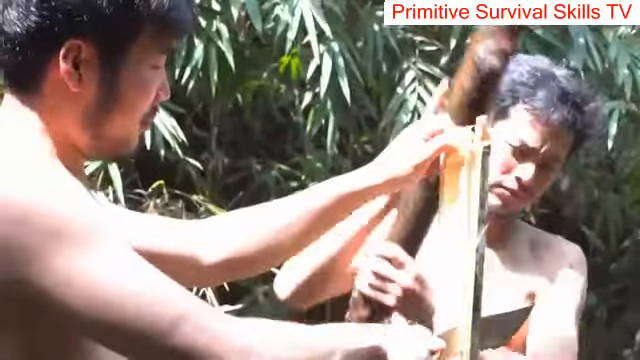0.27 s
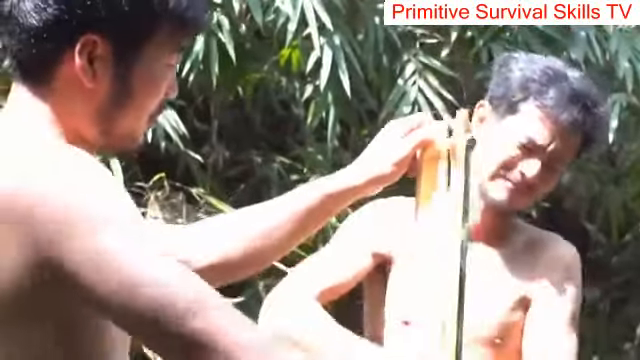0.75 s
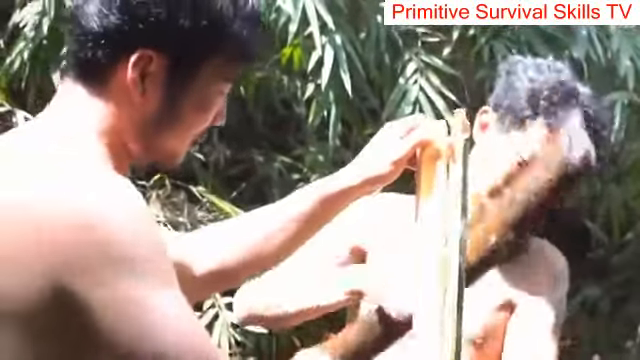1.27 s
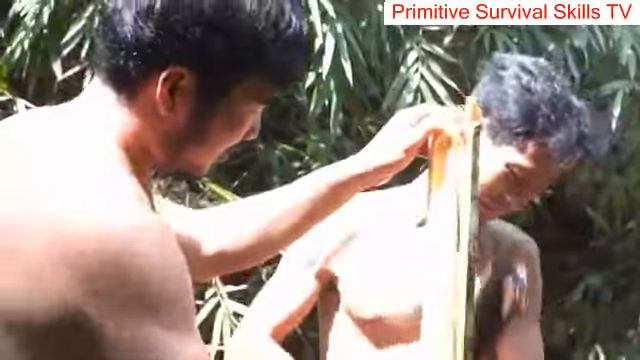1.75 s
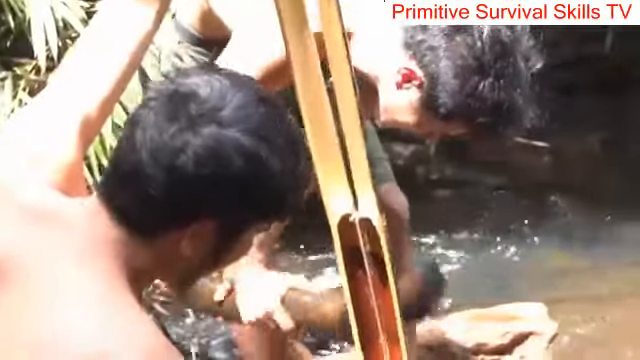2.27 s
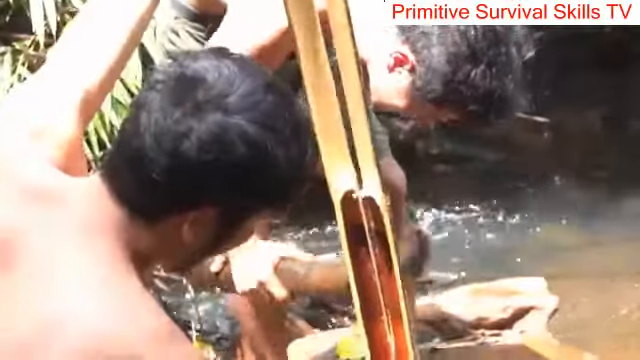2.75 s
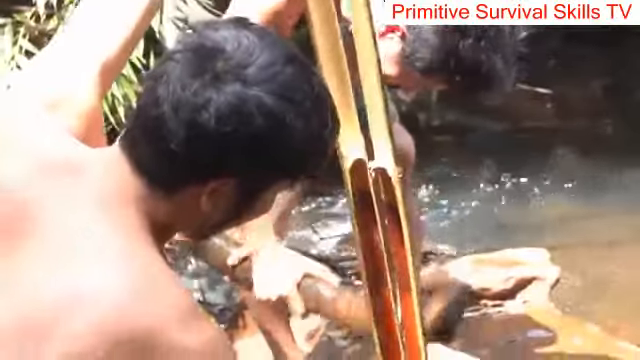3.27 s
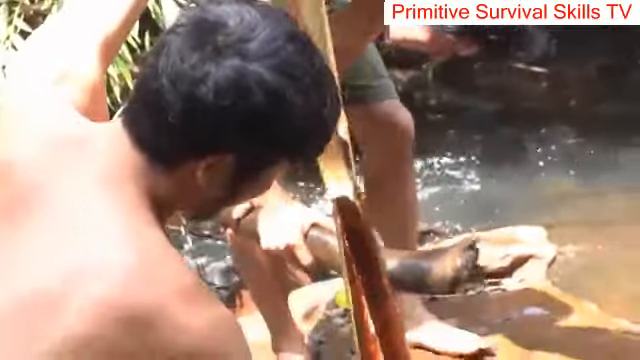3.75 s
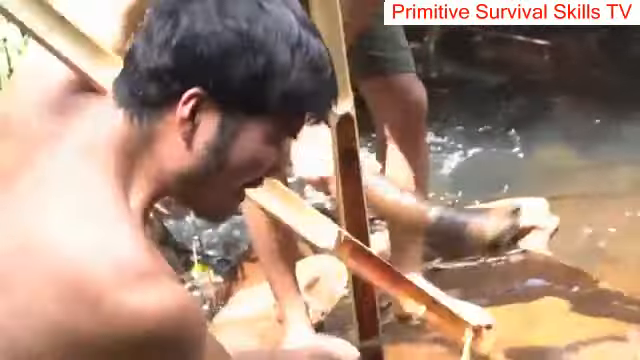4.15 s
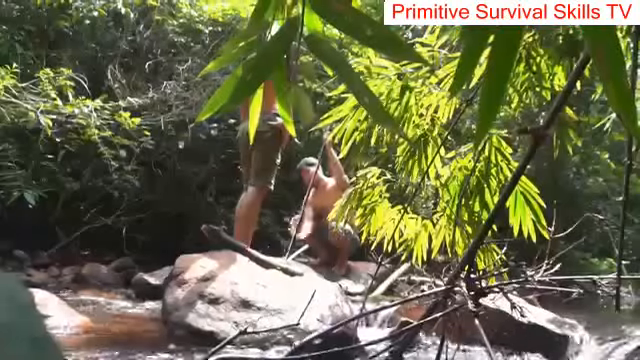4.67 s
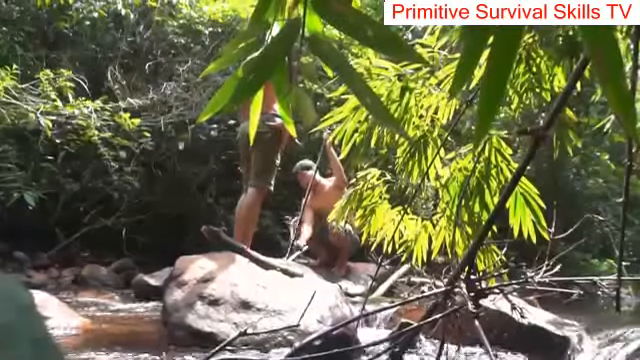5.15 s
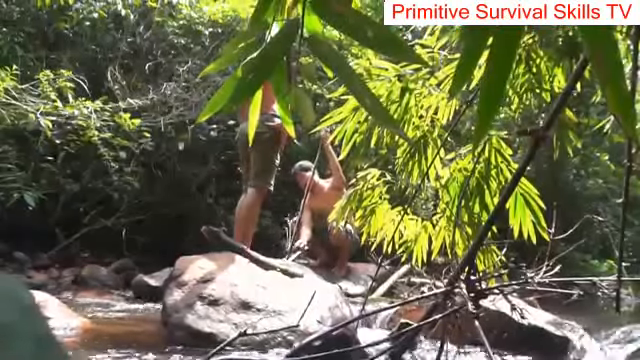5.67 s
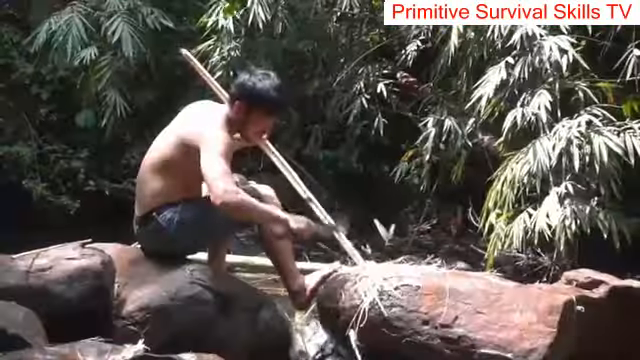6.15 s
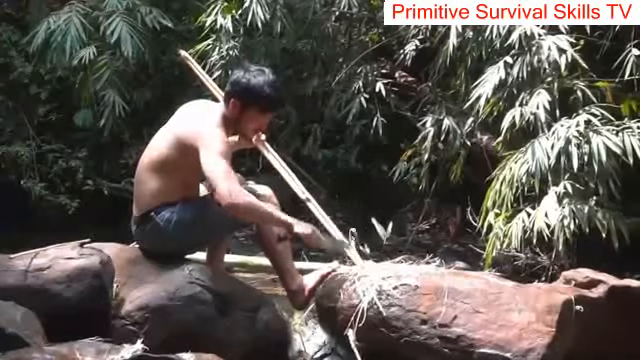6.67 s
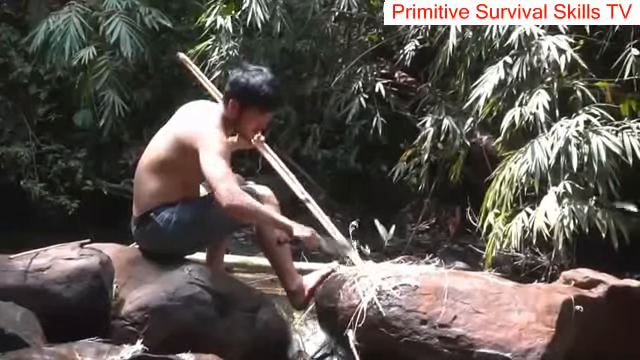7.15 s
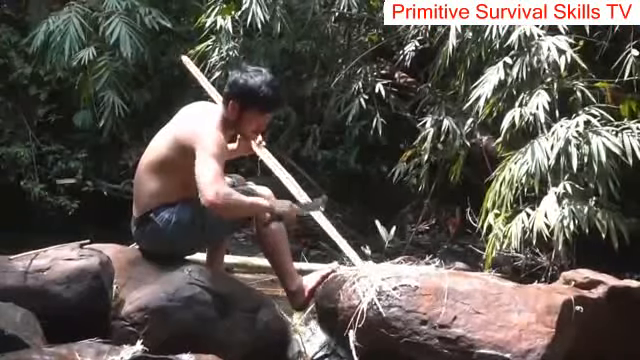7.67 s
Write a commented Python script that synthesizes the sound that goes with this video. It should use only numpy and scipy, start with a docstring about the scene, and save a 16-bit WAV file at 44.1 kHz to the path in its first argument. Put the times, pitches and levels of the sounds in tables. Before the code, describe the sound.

A shallow stream washes and bubbles quietly from the start, with small rising gulps. At about 0.8 seconds a club hits a knife in a bamboo pole: a hollow, boomy knock bursting into a ragged cluster of cracks and tearing fibres. A softer, duller knock with crackle comes at 1.6, a tight one with two sharp snaps at 2.2, then hard, bright whacks at 2.6 and 3.1, the latter loudest, and a milder crackling one at 3.5. Each has a low thud and a faint, short outdoor echo. Around 4.0 to 4.2 thin strips click and rattle lightly. At 4.5 the water abruptly gets louder and fuller, with many round gulps and soft spray puffs near 4.8 and 5.3; faint taps come at 5.7. From 5.9 it is quieter and trickling, with tiny clicks at 6.0 to 6.2, a high plop at 7.0 and a crisp strip tap at 7.6.

```python
"""A shallow rocky stream: bubbles over a wash, with single gulps as swelling, rising tones; heard by a pool.
From 0.8 to 3.5 s a wooden club drives a knife down a bamboo pole: summed modes knock, clipped noise-like
trains of fibre clicks snap as the split runs on, the banks answer faintly, strips spring free.
From 4 s strips are tapped. The stream is heard by a riffle from 4.5 s, with two puffs of spray,
then by a boulder from 5.9 s, where a strip is tapped last."""
import sys
import numpy as np
from scipy import signal
from scipy.fft import rfft, irfft
from scipy.io import wavfile
from scipy.ndimage import uniform_filter1d

SR = 44100
rng = np.random.default_rng(int(sys.argv[2]) if len(sys.argv) > 2 else 0)


def log_audio(samples):
    """Write samples as a 16-bit WAV file to the path given in sys.argv[1]."""
    # one column per channel
    frames = np.atleast_2d(samples).T
    # limit to full scale, then quantise
    limited = np.clip(frames, -1, 1)
    pcm = np.round(limited * 32767).astype(np.int16)
    wavfile.write(sys.argv[1], SR, pcm)


N = 348390

# Stream by the pool. Each row: frequency in Hz, density in dB per Hz.
POOL_COLOUR = [(25, -64.5), (50, -29), (120, -18.5), (160, -14), (195, -5.5), (330, -2.5), (590, -3.5),
               (770, -2.5), (1000, -6), (1150, -6.5), (1600, -8.5), (1850, -8.5), (2250, -10.5),
               (2620, -11), (4100, -15), (7000, -18)]
# Stream by the riffle. Each row: frequency in Hz, density in dB per Hz.
RIFFLE_COLOUR = [(25, -55), (50, -30), (150, -17), (200, -5), (450, -3), (636, -5.5), (800, -3),
                 (1300, -4.5), (1900, -5), (2800, -11), (5300, -13), (7000, -17.5)]
# Stream by the boulder. Each row: frequency in Hz, density in dB per Hz.
BOULDER_COLOUR = [(25, -72.5), (50, -30), (155, -14.5), (190, -3), (410, -4.5), (510, -1.5), (850, -4),
                  (1100, -10), (1350, -2.5), (1620, -2), (2080, -6.5), (2900, -6.5), (3520, -11),
                  (4200, -7.5), (4800, -12.5), (5400, -11), (7000, -13)]
# Lean of the stream at each place. Each row: frequency in Hz, left minus right in dB.
POOL_LEAN_DB = [(60, 0), (160, 0.5), (420, -0.5), (1100, -1), (2890, -2), (7610, 0.5)]
RIFFLE_LEAN_DB = [(60, 1.5), (160, -0.5), (420, 0), (1100, -4), (2890, -3.5), (7610, 4)]
BOULDER_LEAN_DB = [(60, 0.085), (160, 0.18), (420, 0.16), (1100, 0.14), (2890, 0.0), (7610, 1.0)]
# Listening places: pool, riffle, boulder. Each row: start in seconds, stream level in dB rms.
LISTENING_PLACES = [(0, -37), (4.493, -32), (5.946, -38)]
# Likeness of the two ears. Each row: frequency in Hz, correlation from 0 to 1.
EAR_LIKENESS = [(60, 0.77), (130, 0.95), (240, 1), (480, 0.99), (950, 0.95), (1900, 0.64), (3800, 0.4),
                (7000, 0.054)]
# Loudest gulps. Each row: start in seconds, level in dB, starting pitch in Hz.
GULP_EVENTS = [(0.045, -27.5, 763), (0.118, -30, 1120), (0.213, -30, 1180), (0.25, -33, 830),
               (0.714, -33, 530), (0.728, -32, 332), (1.016, -28.5, 1160), (1.148, -34, 700),
               (3.648, -29, 495), (4.395, -27, 1170), (4.398, -27, 996), (4.514, -24, 966),
               (4.574, -27, 594), (4.677, -27, 332), (4.926, -25.5, 763), (4.943, -25, 1060),
               (5.182, -25, 792), (5.293, -25.5, 906), (5.324, -30.5, 442), (5.361, -22, 995),
               (5.440, -28.5, 280), (5.756, -21.5, 840), (5.912, -24.5, 1330), (6.321, -36, 345),
               (6.515, -33.5, 496), (7.006, -25.5, 1560), (7.755, -33, 1900), (7.81, -32.5, 2620)]
# Club blows on the back of the knife. Each row: start in seconds, knock peak in dB, pitch factor,
# ring length factor, grip firmness (an exponent), brightness in dB per octave, boom of the pole in dB,
# level of the edge biting in in dB, decay of the bite in seconds.
CLUB_BLOWS = [(0.7677, -13, 1.15, 1.0, 1.5, 0, 11, -26.5, 0.014),
              (1.5638, -19.5, 1.03, 2.0, 1.6, -5, -8, -30.5, .007),
              (2.2155, -18.5, 0.89, 0.97, 4.8, -4.5, 3.5, -23.5, .006),
              (2.6208, -7.5, 0.97, 0.93, 4.5, 1.5, 8, -18.5, 0.0058),
              (3.0804, -4, 0.96, 0.9, 5, 5.5, 2.5, -18, 0.006),
              (3.4884, -13.5, 1.037, 1.06, 1.8, -2, 3, -30, 0.014)]
# Modes of pole and blade, before each blow's factors.
# Each row: frequency in Hz, level in dB, swell time in seconds.
POLE_MODES = [(281, -16, 0.0065), (345, -22, 0.006), (624, -7, 0.0046), (761, 2, 0.0044),
              (1060, -24, .0035), (1295, -10.5, 0.0037), (1520, -15, .003), (1785, -12.5, 0.002),
              (1970, -13.5, 0.0029), (2230, -14.5, 0.0032), (2550, -18, 0.0029), (2920, -23.5, 0.0012),
              (3280, -23.5, 0.002)]
# Edge crushing fibres. Each row: frequency in Hz, density in dB per Hz.
BITE_COLOUR = [(60, -31), (150, -23.5), (280, -10), (470, -10.5), (800, 1), (1000, -3), (1300, -2.5),
               (2200, 3), (2900, -2), (3500, -9), (4300, -7), (5500, -7), (7000, -6.5)]
# Fibres snapping in a strip. Each row: frequency in Hz, density in dB per Hz.
FIBRE_COLOUR = [(60, -19), (150, -18), (280, -1.5), (470, -8.5), (800, 3.5), (1400, -5), (2200, 2.5),
                (2800, -5), (3300, -3.5), (4300, -11.5), (7000, -8.5)]
# Echo off rocks and trees. Each row: frequency in Hz, time to fall 60 dB in seconds.
ECHO_T60 = [(100, 1), (500, 0.21), (2000, 0.36), (7000, 0.3)]
# Colour of that echo. Each row: frequency in Hz, level in dB.
ECHO_COLOUR = [(100, 4), (600, -4), (1500, -4), (2500, 0), (4000, 3.5), (7000, -2.5)]
# Pole shifted and bumping among stones. Each row: crest in seconds, crest level in dB, sigma in seconds.
POLE_BUMPS = [(0.877, -52, 0.021), (4.093, -52.5, 0.051), (5.715, -52, 0.0092)]
# Breaking bundles. Each row: start in seconds, crest level in dB, time to the crest in seconds,
# brightness in dB per octave, body of the wall in dB, ring of the splinter in dB,
# following crackle relative to the break in dB, left minus right in dB.
BUNDLE_SNAPS = [(0.788, -12, .0014, -3, -9, 5, -16.5, -2.5), (0.7912, -21, 0.0013, -2, 1, 6.5, -15, -4),
                (0.7939, -16, 0.0016, -6.5, 0, 6, -16, 0), (0.7972, -19, 0.0019, -3.5, 8, 1, -19, 0),
                (0.8055, -26, .0016, -1, 4, 0, -18, -2), (0.8246, -23, 0.0021, -1, 2, 5, -17, -1),
                (0.8300, -25, 0.0028, -1, 3, 4, -17, -3), (0.8455, -28, .0016, -5, -3, 3, -14, -2),
                (0.861, -28, 0.0014, 0, -6, 1, -17, -1), (0.907, -29, 0.0034, -4, -5, -4, -8, 1),
                (1.5824, -25, 0.0018, -1.5, -3, 4, -20, -3), (1.5908, -18, 0.0015, -3.5, 0, 1, -19, -2),
                (1.5974, -21, .002, -4.5, 4, -1, -20, -2), (1.6038, -22, .0018, -6.5, 2, 3, -20, -1),
                (1.6072, -20, 0.0016, -7, 1, 1, -18, -2), (2.2259, -16.5, 0.00076, 0, -5, -5, -13, -3),
                (2.2446, -16, .00075, 0, 6, 1, -25, -2), (2.6396, -26, 0.0017, 10, -3, -3, -20, -3),
                (2.685, -31, .0018, -5.5, 1, 10, -13, -8), (3.0882, -15, 0.0014, 1, 0, -9, -11.5, -1),
                (3.4682, -21.5, 0.0011, -5, -1, -6, -17, -4), (3.4758, -26, 0.0018, -6, 5, -10, -17, 1),
                (3.4901, -14, 0.0018, 0.5, 0, -1, -17, -3), (3.4956, -28, 0.0012, -2, 7, -4, -15, 2)]
# Ring of a breaking bundle. Each row: frequency in Hz, density in dB per Hz.
SPLINTER_COLOUR = [(60, -44), (150, -26), (300, -12.5), (800, -4.5), (1200, -4), (1700, -1), (2200, 2.5),
                   (2800, 0), (3500, -1.5), (4400, -2.5), (5150, 0), (5550, -2), (6000, 2), (6400, 0),
                   (7000, 0.5)]
# Split running down the pole. Each row: start in seconds, level in dB, run length in seconds,
# brightness in dB per octave, tail relative to the run in dB, peak of the pole's lurch in dB.
SPLIT_RUNS = [(0.7891, -21.5, 0.0055, 0, -4, -30), (0.8251, -29.5, 0.029, 4, -3.5, -46),
              (1.5900, -26, .017, -4, -9, -27), (2.632, -32, .011, 1.5, -21, -25)]
# Wood tearing lengthwise. Each row: frequency in Hz, density in dB per Hz.
TEAR_COLOUR = [(60, -23), (150, -19.5), (280, -3), (800, -6), (1400, 0.5), (2200, 1), (3300, -5),
               (4300, -3), (5600, -4), (7000, -24.5)]
# Strips springing free or tapped. Each row: start in seconds, click level in dB,
# click brightness in dB per octave, ring level in dB, pitch in Hz.
STRIP_TAPS = [(1.584, -38, -3, -24, 3430), (1.5912, -41, 4, -24, 3300), (4.031, -33, 4.5, -45, 4400),
              (4.0745, -30, 2.5, -34, 4400), (4.0874, -29, -1, -26.5, 3000), (4.0970, -29, 4, -30, 3030),
              (4.0973, -36, 6, -31, 4600), (4.1180, -30.5, 1, -37.5, 3640), (4.2265, -33, 1.5, -33, 3200),
              (5.6774, -29, 6, -44, 3120), (5.7522, -32, 1.5, -26.5, 3000), (6.0417, -34, 5, -30.5, 3630),
              (6.0457, -39, 5, -32, 3920), (6.1565, -39, 6.5, -36, 5300), (7.5748, -21, 10.5, -25, 2430)]
# Modes of a strip. Each row: pitch ratio, level in dB, decay in seconds.
STRIP_MODES = [(1, -1, .0042), (1.09, -12.5, .003), (1.24, -10.5, 0.0025), (1.5, -12.5, 0.0032)]
# Spray thrown up by the riffle. Each row: crest in seconds, crest level in dB, sigma in seconds.
SPRAY_PUFFS = [(4.798, -35.5, 0.016), (5.26, -39.5, 0.021)]

EDGE_HZ = 7100  # upper band limit
SURGE_DB, SURGE_S = 0.35, 0.15  # random swell and ebb of the flow: rms depth, smoothing
BOOM_HZ = 450  # the pole's whole length booms in the modes below this
RADIATE_HZ = 170  # a slender pole radiates little below this
CRACK_PAN_DB = -1  # left minus right: the pole stands a little to the right
BITE_DELAY_S, BITE_BRIGHT_DB_PER_OCT = 0.000703, -1.5
THUD_DB, THUD_DB_PER_BLOW_DB = -47.5, 0.62  # thud level at a 0 dB blow, slope
THUD_DELAY_S, THUD_SIGMA_S = 0.0093, 0.01414
BODY_HZ, BODY_OCTAVES, RING_HZ, RING_OCTAVES = 550, 0.54, 3480, 0.2  # wall, free splinter
SNAP_STEEPNESS, SNAP_TAIL_S, SNAP_TAIL_BRIGHT_DB_PER_OCT = 2.4, 0.024, -1.5
SLIP_EVERY_S, SLIP_DECAY_S, STOP_S = 0.006, 0.035, 0.0089  # the blade sticks and slips, then stops
RUN_FADE_DB_PER_S = -90  # the jerks weaken as the blade slows
SPLIT_TAIL_S = 0.047  # strained fibres go on giving way after the run
LURCH_AT = 0.49  # share of the run
LURCH_PITCH, LURCH_RING, LURCH_FIRMNESS, LURCH_BRIGHT_DB_PER_OCT = 1.2, 1.7, 2.6, -2
TAP_DECAY_S, TAP_PAN_DB = 0.003, 0.5  # click of a tap; left minus right
SETTLE_DB, SETTLE_S = -11, 0.019  # rustle after it, relative to the click


def gain_of(db):
    """Decibels to amplitude."""
    return 10 ** (np.asarray(db) / 20)


def evened(x):
    """Scales to rms 1."""
    return x / np.sqrt(np.mean(x ** 2) + 1e-20)


def read(points, hz):
    """Reads a table on a log-frequency axis."""
    f, value = np.transpose(points)
    return np.interp(np.log(hz + 1), np.log(f + 1), value)


def add(mix, start_s, sound):
    """Mixes in a stereo sound."""
    part = mix[:, max(round(start_s * SR), 0):][:, :sound.shape[1]]
    part += sound[:, :part.shape[1]]


def panned(left_db):
    """Left and right gains for a level difference."""
    return gain_of(np.array([[.5], [-.5]]) * left_db)


def paired(z, likeness):
    """Blends two unrelated spectra into a left and right of the given correlation."""
    angle = np.arccos(np.clip(likeness, -1, 1)) / 2
    return z[0] * np.cos(angle) + np.array([[1], [-1]]) * z[1] * np.sin(angle)


def bubble(hz, cycles, lag_s, glide=0.034):
    """A pocket of air rings, rising in pitch as it surfaces; the ears differ in phase by lag_s."""
    u = np.arange(int(5 * cycles / hz * SR)) * hz / (cycles * SR)  # time in decay times
    turns = cycles * (u + glide * u ** 2 / 2) + hz * lag_s * np.array([[.5], [-.5]])
    return (1 - np.exp(-6 * u)) * np.exp(-u) * np.sin(2 * np.pi * turns)


def babble(count=7000, low_hz=210, high_hz=6500, large_spread_db=6.0, small_spread_db=2.0,
           cycles=7, lag_s=0.00015, slope=1.0):
    """Bubbles scattered across the stream: large ones burble unevenly, small ones merge into a fizz."""
    out = np.zeros((2, N))
    for when, pitch, size, ring, place in rng.random((count, 5)):
        hz = low_hz * (high_hz / low_hz) ** pitch
        spread_db = np.interp(pitch, [0, 1], [large_spread_db, small_spread_db])
        level = gain_of(spread_db * min(-np.log(size), 3.6)) * hz ** slope
        add(out, when * N / SR, level * bubble(hz, cycles * (.5 + ring), lag_s * (2 * place - 1)))
    return evened(out)


def stream(bubbles_db=-9.0, flicker_db=0.5):
    """Bubbles over a rushing wash, coloured by the rocks around each listening place."""
    hz, t = np.fft.rfftfreq(N, 1 / SR), np.arange(N) / SR
    flicker = gain_of(flicker_db * evened(uniform_filter1d(rng.standard_normal(N), size=700)))
    wash = paired(rfft(rng.standard_normal((2, N)) * flicker), read(EAR_LIKENESS, hz))
    water = wash + gain_of(bubbles_db) * rfft(babble())
    starts_s, levels_db = np.transpose(LISTENING_PLACES)
    place = np.searchsorted(starts_s[1:], t)
    colours = [POOL_COLOUR, RIFFLE_COLOUR, BOULDER_COLOUR]
    leans = [POOL_LEAN_DB, RIFFLE_LEAN_DB, BOULDER_LEAN_DB]
    out = np.zeros((2, N))
    for k, (colour, lean) in enumerate(zip(colours, leans)):
        heard = evened(irfft(water * gain_of(read(colour, hz)) * panned(read(lean, hz)), N))
        crossfade = uniform_filter1d(1. * (place == k), size=1400)
        out += gain_of(levels_db[k]) * heard * crossfade
    surge = evened(irfft(rfft(rng.standard_normal(N)) * np.exp(-(hz * SURGE_S) ** 2), N))
    return out * gain_of(SURGE_DB * surge)


def gulps(cycles=9, pan_db=0.5):
    """Single large bubbles close by."""
    out = np.zeros((2, N))
    for start_s, db, hz in GULP_EVENTS:
        add(out, start_s, gain_of(db) * panned(pan_db) * bubble(hz, cycles, 0))
    return out


def knock(peak_db, pitch, ring, firmness, bright_db_per_oct, boom_db=0, push_s=.0044, pan_db=-1):
    """The club pushes the blade in; modes crest with the push, and the firmer the grip, the sooner they die."""
    t = np.arange(4000) / SR
    out = np.zeros(len(t))
    for hz, mode_db, rise_s in POLE_MODES:
        u = t / (rise_s * ring)
        level_db = mode_db + bright_db_per_oct * np.log2(hz / 750) + boom_db * (hz < BOOM_HZ)
        envelope = (u * np.exp(1 - u)) ** firmness
        out += gain_of(level_db) * envelope * np.cos(2 * np.pi * hz * pitch * (t - push_s * ring))
    return gain_of(peak_db) * panned(pan_db) * out / abs(out).max()


def dying(decay_s, hold_s=0, size=16384):
    """An envelope that holds, then dies away."""
    return np.exp(-np.maximum(np.arange(size) / SR - hold_s, 0) / decay_s)


def crackle(db, envelope, bright_db_per_oct, colour=FIBRE_COLOUR, pan_db=CRACK_PAN_DB,
            snaps_per_s=3800, spread_db=0.0, likeness=0.13):
    """A run of fibres snaps under an envelope, each a click of its own strength."""
    size = len(envelope)
    hz = np.fft.rfftfreq(size, 1 / SR)
    chance, strength, sign = rng.random((3, 2, size))
    struck = (chance < snaps_per_s / SR) | (np.arange(size) == np.argmax(envelope))
    strengths = gain_of(spread_db * np.minimum(-np.log(strength), 3))
    z = rfft(struck * np.sign(sign - .5) * strengths * envelope)
    # the pole's wall alone colours the clicks: their own smoothed spectrum is divided out
    own_colour = np.sqrt(abs(uniform_filter1d(abs(z) ** 2, size=size // 128, axis=1)) + 1e-12)
    tilt_db = bright_db_per_oct * np.log2(np.clip(hz, 200, EDGE_HZ) / 2000)
    log_gain = np.log(gain_of(read(colour, hz) + tilt_db) / own_colour)
    # minimum phase: the wall rings only after each click
    mirrored = np.hstack([log_gain, log_gain[:, -2:0:-1]])
    wall = np.exp(np.conj(signal.hilbert(mirrored)))[:, :len(hz)]
    z = paired(z * wall, likeness + (1 - likeness) * read(EAR_LIKENESS, hz))
    heard_rms = np.linalg.norm(irfft(z * (hz < EDGE_HZ))) / np.linalg.norm(envelope)
    return gain_of(db) * panned(pan_db) * irfft(z) / heard_rms


def blows():
    """Each blow knocks the pole while the edge bites in, crushing a few fibres."""
    out = np.zeros((2, N))
    for start_s, peak_db, pitch, ring, firmness, bright, boom_db, bite_db, bite_decay_s in CLUB_BLOWS:
        add(out, start_s, knock(peak_db, pitch, ring, firmness, bright, boom_db))
        bite = crackle(bite_db, dying(bite_decay_s, size=4096), BITE_BRIGHT_DB_PER_OCT, BITE_COLOUR)
        add(out, start_s + BITE_DELAY_S, bite)
    return out


def banks(x, early_db=-14, early_decay_s=0.024, late_db=-19, delay_s=0.0056, slap_db=-21, slap_delay_s=0.019):
    """Quick reflections off bodies and stones, a slap from the far bank, a faint tail from the trees."""
    hz = np.fft.rfftfreq(SR, 1 / SR)
    noise = rfft(rng.standard_normal((2, SR)))
    taps = irfft(paired(noise, read(EAR_LIKENESS, hz)) * gain_of(read(ECHO_COLOUR, hz)), SR)
    early = taps * np.exp(-np.arange(SR) / SR / early_decay_s)
    band_hz, t, z = signal.stft(taps[:, ::-1], SR, nperseg=256)
    fade = gain_of(-60 * t / read(ECHO_T60, band_hz)[:, None])
    late = signal.istft(z * fade, SR, nperseg=256)[1][:, :SR]
    echo = gain_of(early_db) * early / np.linalg.norm(early[0])
    echo = echo + gain_of(late_db) * late / np.linalg.norm(late[0])
    out = np.zeros((2, N))
    add(out, delay_s, signal.fftconvolve(x, echo, axes=1))
    add(out, slap_delay_s, gain_of(slap_db) * x[::-1])  # ears swapped
    return out


def swell(crest_s, db, sigma_s, low_hz, high_hz, order=4):
    """Start time and sound of band-limited noise that rises and falls about crest_s."""
    t = np.arange(-3 * sigma_s, 3 * sigma_s, 1 / SR)
    band = signal.butter(order, [low_hz, high_hz], "band", fs=SR, output="sos")
    noise = signal.sosfilt(band, rng.standard_normal((2, SR)))[:, -len(t):]
    return crest_s + t[0], gain_of(db) * evened(noise) * np.exp(-(t / sigma_s) ** 2 / 2)


def thuds_and_bumps():
    """Low noise swells, alike in both ears: blows drive the pole's foot into the ground; shifting bumps it."""
    out = np.zeros((2, N))
    thuds = [(start_s + THUD_DELAY_S, THUD_DB + THUD_DB_PER_BLOW_DB * db, THUD_SIGMA_S)
             for start_s, db, *_ in CLUB_BLOWS]
    for row in thuds + list(POLE_BUMPS):
        add(out, *swell(*row, low_hz=80, high_hz=185, order=3))
    return out[0]


def hump(hz, centre_hz, octaves):
    """A bell of height 1 on a log-frequency axis."""
    return np.exp(-(np.log2(hz / centre_hz) / octaves) ** 2 / 2)


def snaps():
    """A bundle breaks in one crack, coloured by wall and splinter; its neighbours crackle more softly after."""
    out, t = np.zeros((2, N)), np.arange(2048) / SR
    for start_s, db, crest_s, bright, body_db, ring_db, tail_db, pan_db in BUNDLE_SNAPS:
        colour = []
        for hz, level_db in SPLINTER_COLOUR:
            body = body_db * hump(hz, BODY_HZ, BODY_OCTAVES)
            ring = ring_db * hump(hz, RING_HZ, RING_OCTAVES)
            colour.append((hz, level_db + body + ring))
        breaking = (t / crest_s * np.exp(1 - t / crest_s)) ** SNAP_STEEPNESS
        add(out, start_s, crackle(db, breaking, bright, colour, pan_db, snaps_per_s=7600))
        tail = crackle(db + tail_db, dying(SNAP_TAIL_S, size=8192), SNAP_TAIL_BRIGHT_DB_PER_OCT,
                       SPLINTER_COLOUR, pan_db, snaps_per_s=650, spread_db=4.5)
        add(out, start_s + crest_s, tail)
    return out


def splits():
    """The blade slips forward in quick jerks, the pole lurches, and the crackle fades."""
    out = np.zeros((2, N))
    for start_s, db, run_s, bright, tail_db, lurch_db in SPLIT_RUNS:
        moving = dying(STOP_S, hold_s=run_s)
        t = np.arange(len(moving)) / SR
        slips = np.exp(-(t % SLIP_EVERY_S) / SLIP_DECAY_S) * gain_of(RUN_FADE_DB_PER_S * t)
        tail = gain_of(tail_db) * dying(SPLIT_TAIL_S, hold_s=run_s)
        envelope = np.hypot(moving * slips, tail)
        add(out, start_s, crackle(db, envelope, bright, TEAR_COLOUR, snaps_per_s=3000, spread_db=6.0))
        lurch = knock(lurch_db, LURCH_PITCH, LURCH_RING, LURCH_FIRMNESS, LURCH_BRIGHT_DB_PER_OCT)
        add(out, start_s + LURCH_AT * run_s, lurch)
    return out


def strips(pan_db=-2):
    """Thin strips click, ring briefly in decaying modes and rustle as they settle."""
    out, t = np.zeros((2, N)), np.arange(4000) / SR
    for start_s, click_db, bright, ring_db, hz in STRIP_TAPS:
        ring = sum(gain_of(db) * np.exp(-t / decay_s) * np.sin(2 * np.pi * hz * ratio * t)
                   for ratio, db, decay_s in STRIP_MODES)
        add(out, start_s, gain_of(ring_db) * panned(pan_db) * ring)
        settling = gain_of(SETTLE_DB) * dying(SETTLE_S)
        envelope = np.hypot(dying(TAP_DECAY_S), settling)
        add(out, start_s, crackle(click_db, envelope, bright, pan_db=TAP_PAN_DB))
    return out


def spray():
    """Spray hisses wide: high noise swells, unrelated in the two ears."""
    out = np.zeros((2, N))
    for row in SPRAY_PUFFS:
        add(out, *swell(*row, low_hz=3000, high_hz=6560))
    return out


def scene():
    """Bamboo work and its echo over the stream."""
    water = stream() + gulps()
    radiated = signal.butter(2, RADIATE_HZ, "high", fs=SR, output="sos")
    bamboo = blows() + signal.sosfilt(radiated, snaps() + splits()) + strips()
    return water + bamboo + banks(bamboo) + thuds_and_bumps() + spray()


def record(dry):
    """A steep low-pass at the band limit."""
    lowpass = signal.firwin(1023, EDGE_HZ, window=("kaiser", 8), fs=SR)
    return signal.oaconvolve(dry, lowpass[None], "same")


dry = scene()
out = record(dry)
log_audio(out)
```